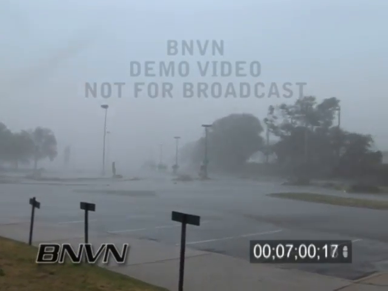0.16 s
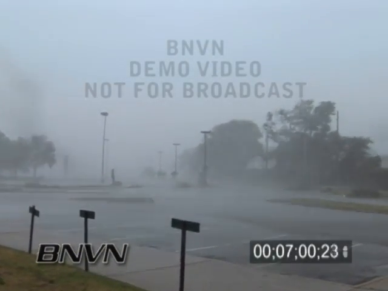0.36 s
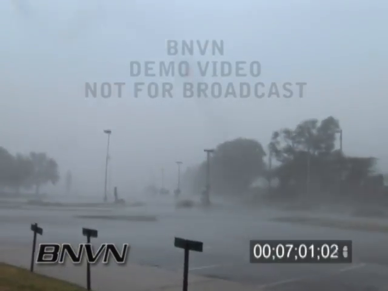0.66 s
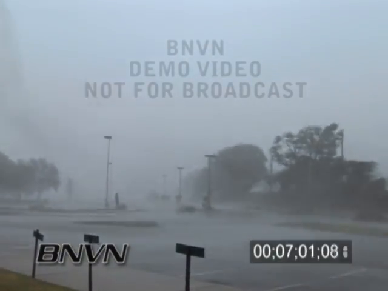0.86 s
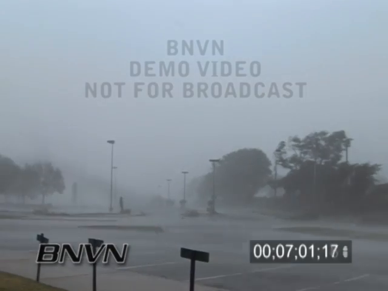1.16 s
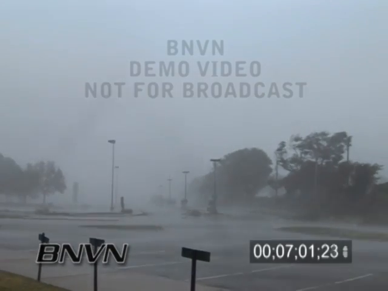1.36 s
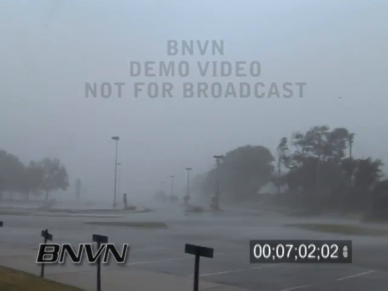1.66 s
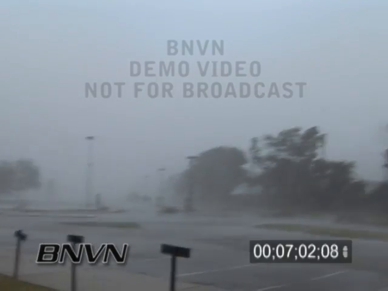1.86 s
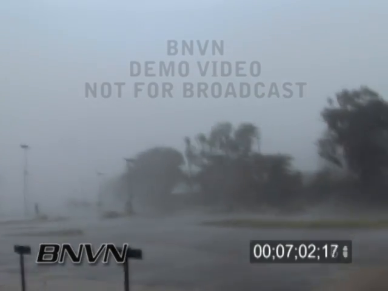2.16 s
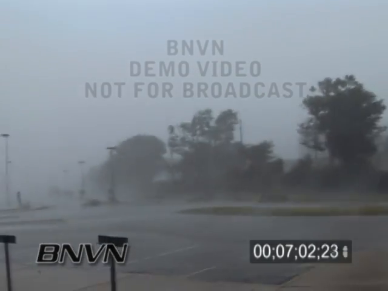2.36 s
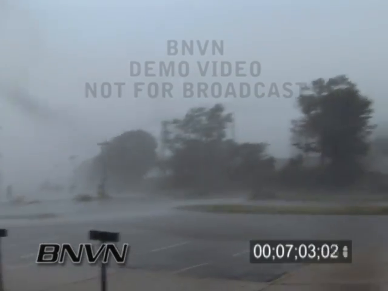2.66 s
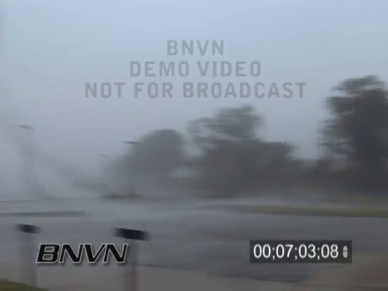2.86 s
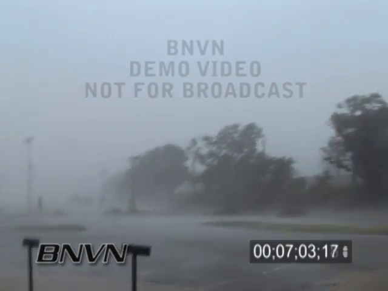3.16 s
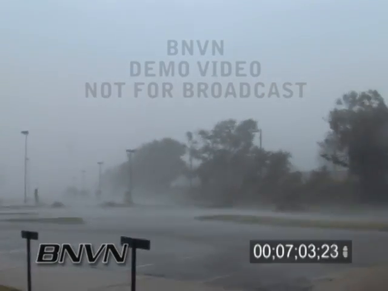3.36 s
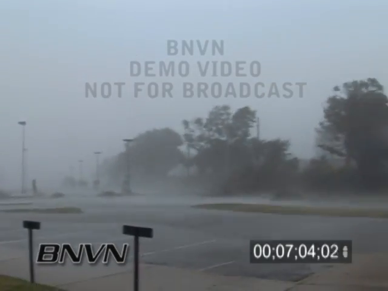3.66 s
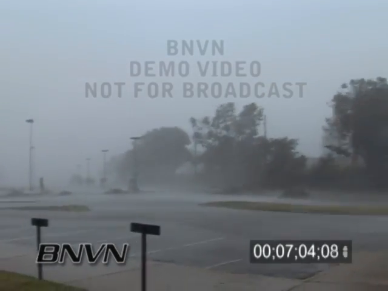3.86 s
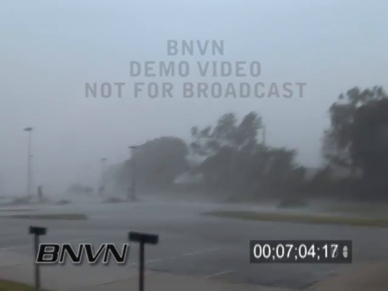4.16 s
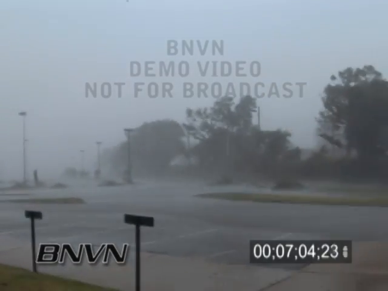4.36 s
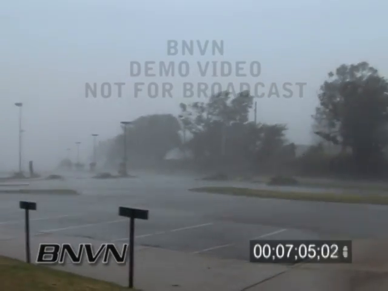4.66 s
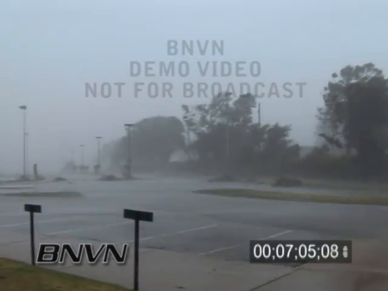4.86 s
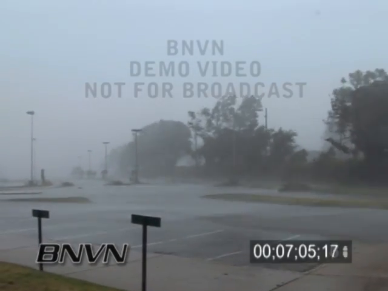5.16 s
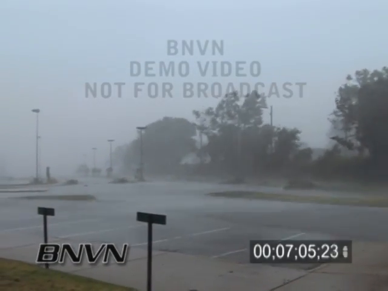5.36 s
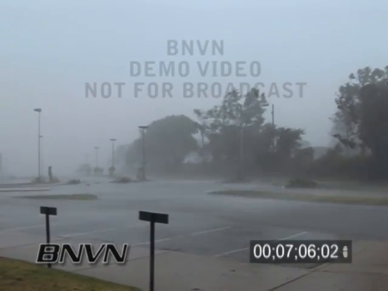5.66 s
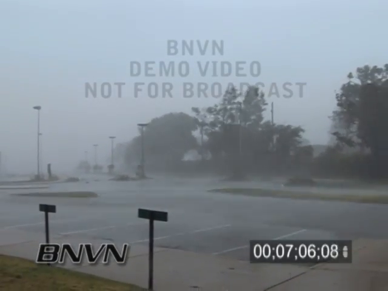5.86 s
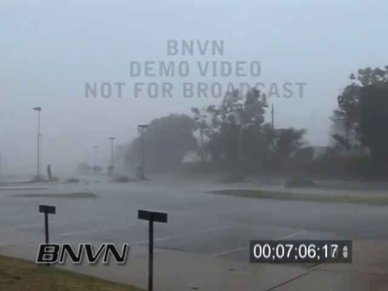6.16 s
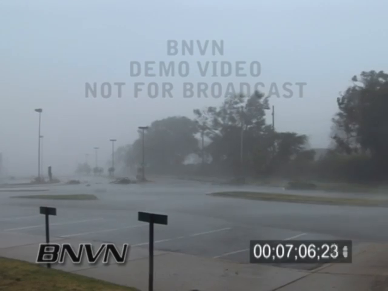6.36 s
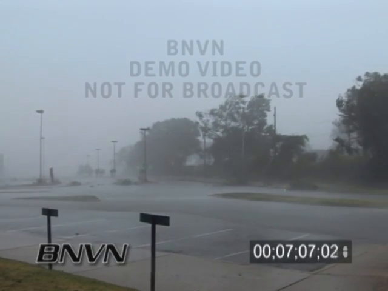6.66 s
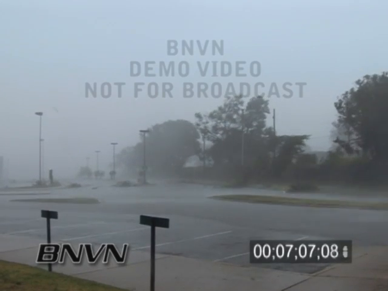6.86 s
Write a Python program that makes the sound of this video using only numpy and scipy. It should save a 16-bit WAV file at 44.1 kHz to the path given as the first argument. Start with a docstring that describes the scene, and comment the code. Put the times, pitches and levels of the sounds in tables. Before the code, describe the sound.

Steady rush of gale and heavy rain outdoors, bass gusts rumbling on the microphone, strongest in the first half, rain thinning slightly toward the end.

```python
"""An open car park, heard from under shelter while a storm sweeps across it.
Wind is filtered Gaussian noise in three layers: bass buffeting of the microphone, a low moan and a roar of far air.
Rain on the asphalt and fine spray are dense trains of random impulses, heard as a hiss with a sizzle on top.
Every layer but the smooth moan swells in patches of frequency; the rain and spray ease in the later part.
The stereo width varies with frequency: some treble bands are in phase, others in opposition."""
import sys
import numpy as np
from scipy import signal
from scipy.fft import rfft, irfft, next_fast_len
from scipy.io import wavfile

SR = 44100
rng = np.random.default_rng(int(sys.argv[2]) if len(sys.argv) > 2 else 0)


def put_to_file(sound):
    """Save the sound as 16-bit audio at rate SR, in the file named by the first command-line argument."""
    columns = np.atleast_2d(sound).T  # one column per channel
    safe = np.clip(columns, -1, 1)
    whole_steps = np.round(safe * 32767)
    wavfile.write(sys.argv[1], SR, whole_steps.astype(np.int16))


N = 309141  # length [samples]
SIZE = next_fast_len(N)  # transform length [samples]
HZ = np.maximum(np.arange(SIZE // 2 + 1) * SR / SIZE, 1)  # frequency of each spectral bin [Hz]

# Edges between neighbouring layers, from the bass up [Hz]
LOWEST_HZ, BUFFET_TOP_HZ, MOAN_TOP_HZ = 12, 200, 650
WIND_TOP_HZ, RAIN_TOP_HZ, SPRAY_TOP_HZ = 2500, 7400, 12500
CUTOFF_HZ = 12020  # edge of the final low-pass

# Spectral colour of wind, rain and spray: (frequency [Hz], relative density [dB per Hz])
WIND_COLOUR = [(12, -19), (22, -8), (30, -11), (40, -4), (65, -1), (90, -2), (120, 0), (160, -3), (190, -5),
               (230, -6), (290, -9), (370, -8.5), (500, -11), (650, -10.5), (800, -13), (1000, -11.5),
               (1250, -13.5), (1550, -10.5)]
RAIN_COLOUR = [(1900, -15), (2400, -18.5), (2950, -22), (3550, -19), (4200, -25.5), (5000, -26),
               (6000, -29), (6700, -35)]
SPRAY_COLOUR = [(7150, -38.5), (7400, -44), (7700, -39), (7950, -40.5), (8120, -46), (8350, -41.5),
                (8600, -41.5), (8950, -40), (9400, -40.5), (10100, -37), (10600, -38.5), (11100, -37),
                (11500, -39.5), (11900, -51)]

# Stereo width of wind, rain and spray; above 0 dB the channels move in opposition:
# (frequency [Hz], difference level minus sum level of the channels [dB])
WIND_STEREO = [(100, -75), (170, -62), (240, -41), (300, -21.5), (520, -15), (850, -11.5), (1400, -17.5),
               (2150, -6.5), (2550, -10.5), (2680, -55), (2850, -34), (2950, -75)]
RAIN_STEREO = [(4100, -75), (4230, -5.5), (4450, 11), (4550, 25), (4640, 32), (4780, 6), (5000, -11),
               (5140, -25), (5280, -22), (5420, -8), (5600, 6), (6000, 2.5), (6300, 21.5), (6500, 43),
               (6800, 40), (6900, 12)]
SPRAY_STEREO = [(7150, 7), (7400, 2), (7600, 5), (7850, 6), (8100, -3), (8400, -0.5), (8650, -4),
                (8950, -4), (9300, 7), (9800, -8), (10150, -13), (10450, -28), (10900, -27), (11100, -17),
                (11650, -14), (11800, -22), (11950, -40)]

# Part of the channel difference that follows the sum; a share in step above 0 is louder on the left:
# (frequency [Hz], share in step [ratio], share turned a quarter cycle [ratio])
SUM_TO_DIFFERENCE = [(300, 0.01, 0.089), (650, 0.028, -0.18), (1000, -0.2, -.05), (1600, 0, -.2),
                     (2000, -.2, -.06), (2400, -.05, .15), (4300, .1, .25), (4900, -.15, -.22),
                     (5700, -.2, .25), (6100, -.25, -.08), (7000, 0, .12), (7700, -.08, .18),
                     (8300, -.05, -.07), (9500, .15, .1), (11200, .03, -.07)]

# Gusts of wind, near and far: (time [s], buffeting level [dB], roar level [dB])
GUST_LEVELS = [(0, -29.5, -24), (0.3, -27.5, -25.5), (0.6, -26.5, -25), (0.85, -27.5, -24.0),
               (1.1, -25.5, -23.5), (1.3, -23, -23.0), (1.5, -25.5, -22.5), (1.7, -23, -22.0),
               (1.9, -23, -23), (2.05, -23.5, -24), (2.25, -24.5, -25.0), (2.45, -23.5, -24.5),
               (2.65, -22, -23.5), (2.88, -24, -24.5), (3.0, -21, -22), (3.15, -22.0, -22.5),
               (3.32, -23.5, -21.5), (3.47, -24.5, -24), (3.7, -22.5, -24), (3.9, -23.5, -24.5),
               (4.15, -22, -24.5), (4.4, -24.5, -25.5), (4.65, -25, -25.0), (4.95, -24.5, -25.5),
               (5.3, -25, -26), (5.65, -25.5, -25), (6.0, -24, -25.5), (6.3, -25, -26.0),
               (6.65, -24.5, -25), (7.0, -27, -25)]
# Low part of the far wind, swelling on its own: (time [s], level [dB])
MOAN_LEVEL = [(0, -29.5), (0.3, -29), (0.6, -30), (0.85, -28.5), (1.1, -27.5), (1.3, -25.5), (1.5, -25.5),
              (1.7, -25.5), (1.9, -26.5), (2.05, -27), (2.25, -27.5), (2.45, -28.0), (2.65, -27.5),
              (2.88, -28), (3.0, -27.5), (3.15, -24.5), (3.32, -26), (3.47, -28.0), (3.7, -27.5),
              (3.9, -28.5), (4.15, -29.0), (4.4, -28.5), (4.65, -28.5), (4.95, -28.5), (5.3, -29.0),
              (5.65, -28.5), (6.0, -29), (6.3, -28), (6.65, -28), (7.0, -30)]
# Spectral tilt of the wind, added at a layer's low edge and taken from its high edge:
# (time [s], buffeting lean [dB], roar lean [dB])
WIND_LEANS = [(0, 3.5, -1.5), (.5, 0.5, -1), (1.0, 1, -1.5), (1.4, 2, -0.5), (1.8, 3, -2.5),
              (2.4, 3.5, -1.5), (3.0, -0.5, -1), (3.6, 0, -1), (4.3, 1, -1), (5.0, 1.5, -1),
              (5.6, 0.5, -0.5), (6.3, 2.5, -1), (7.01, -0.5, -1)]
# Rain, driven harder in the gusts and easing later: (time [s], level [dB])
RAIN_LEVELS = [(0, -34.5), (0.3, -34.0), (0.6, -35.0), (0.85, -33), (1.1, -34.5), (1.3, -33), (1.5, -31.5),
               (1.7, -32.5), (1.9, -31.5), (2.05, -33.0), (2.25, -34), (2.45, -32.5), (2.65, -33),
               (2.88, -33.5), (3.0, -31.5), (3.15, -32), (3.32, -32.5), (3.47, -33.0), (3.7, -33.0),
               (3.9, -34), (4.15, -33.5), (4.4, -35.5), (4.65, -34.5), (4.95, -34.5), (5.3, -36),
               (5.65, -35.0), (6.0, -36.0), (6.3, -35.5), (6.65, -36), (7.0, -37)]
# Spray blown past in sheets: (time [s], level [dB])
SPRAY_LEVELS = [(0, -51), (0.3, -48.5), (0.6, -49.5), (0.85, -48.5), (1.1, -47.5), (1.3, -47.5), (1.5, -46),
                (1.7, -44.5), (1.9, -46), (2.05, -46.5), (2.25, -47), (2.45, -46), (2.65, -46.0),
                (2.88, -46), (3.0, -44), (3.15, -43.5), (3.32, -46.0), (3.47, -47), (3.7, -46.5),
                (3.9, -46), (4.15, -47.5), (4.4, -49.5), (4.65, -50.5), (4.95, -49), (5.3, -51.0),
                (5.65, -50), (6.0, -50.5), (6.3, -50.5), (6.65, -51.5), (7.0, -51.5)]


def buffeting(level_db, lean_db):
    """Turbulent pressure: eddies push on the microphone in lumps, a bass noise of unsteady colour."""
    eddies = noise_pair()
    lumps = patchy(eddies, LOWEST_HZ, BUFFET_TOP_HZ, count=4, patchy_db=0.5, rate_hz=7.1,
                   shared=0.52, lean_db=lean_db)
    return from_db(level_db) * lumps


def roar(level_db, lean_db):
    """Aerodynamic noise: far air tearing past trees and poles radiates a broad band."""
    far_air = noise_pair()
    rush = patchy(far_air, MOAN_TOP_HZ, WIND_TOP_HZ, count=5, patchy_db=0.55, rate_hz=12.0,
                  shared=0.22, lean_db=lean_db)
    return from_db(level_db) * rush


def moan(level_db):
    """Aerodynamic noise, low part: the far wind is a smooth band with almost no patchiness."""
    deep_air = noise_pair()
    smooth = patchy(deep_air, BUFFET_TOP_HZ, MOAN_TOP_HZ, count=3, patchy_db=0.02, rate_hz=5.9, shared=0.33)
    return from_db(level_db) * smooth


def rain(level_db):
    """Superposition of impacts: so many drops land at once that they blur to a hiss."""
    impacts = pair(drops(15000, spread_db=1.0))
    hiss = patchy(impacts, WIND_TOP_HZ, RAIN_TOP_HZ, count=6, patchy_db=0.97, rate_hz=14.6, shared=0.11)
    return from_db(level_db) * hiss


def spray(level_db):
    """Superposition of fine impacts: a sizzle above the rain whose bands flicker faster."""
    mist = pair(drops(15000, spread_db=-1.5))  # negative spread: the uneven drops are smaller
    sizzle = patchy(mist, RAIN_TOP_HZ, SPRAY_TOP_HZ, count=5, patchy_db=1.3, rate_hz=23.0, shared=0.1)
    return from_db(level_db) * sizzle


def drops(per_s, spread_db):
    """Shot noise: two trains of impulses at random moments, of random sign and uneven size."""
    unevenness = np.minimum(rng.exponential(1, (2, SIZE)), 5)
    sizes = from_db(spread_db * unevenness)
    signs = rng.choice([-1, 1], (2, SIZE))
    landed = rng.random((2, SIZE)) < per_s / SR
    return sizes * signs * landed


def noise_pair():
    """Random excitation: two independent Gaussian noises, coloured and spread over two channels."""
    return pair(rng.standard_normal((2, SIZE)))


def pair(excite):
    """Sum-and-difference stereo: left and right spectra, whose difference partly follows their sum."""
    first, second = rfft(excite)
    hz, in_step, turned = np.transpose(SUM_TO_DIFFERENCE)
    kin = np.interp(HZ, hz, in_step) + 1j * np.interp(HZ, hz, turned)
    independent = np.sqrt(np.clip(1 - abs(kin) ** 2, 0, 1))  # keeps the power of the difference
    width_db = along_hz(WIND_STEREO + RAIN_STEREO + SPRAY_STEREO)
    angle = np.arctan(from_db(width_db))
    middle = np.cos(angle) * first
    side = np.sin(angle) * (kin * first + independent * second)
    colour_db = along_hz(WIND_COLOUR + RAIN_COLOUR + SPRAY_COLOUR)
    return from_db(colour_db) * (middle + side * [[1], [-1]])


def patchy(spectra, low_hz, high_hz, count, patchy_db, rate_hz, shared, lean_db=0):
    """Band-wise modulation: overlapping bands swell partly together, partly alone; the whole has rms 1."""
    spectra = spectra * np.sqrt(above(low_hz) - above(high_hz))
    place = count * np.log(HZ / low_hz) / np.log(high_hz / low_hz)
    place = np.clip(place, 0, count)
    layer = 0
    together = drift(rate_hz / 2)
    for k in range(count + 1):
        window = np.clip(1 - abs(place - k), 0, 1)
        tilt_db = lean_db * (1 - 2 * k / count)
        swell_db = patchy_db * (shared * together + drift(rate_hz)) + tilt_db
        band = irfft(spectra * window, SIZE)[:, :N]
        layer = layer + from_db(swell_db) * band
    return rms_one(layer)


def drift(rate_hz):
    """Low-passed chance: noise at every 40th sample through two equal one-pole filters, rms 1."""
    pole = np.exp(-2 * np.pi * rate_hz * 40 / SR)
    white = rng.standard_normal(N // 40 + 2002)
    slow = signal.lfilter([1], [1, -2 * pole, pole * pole], white)
    slow = rms_one(slow[2000:])  # drop the filter's start
    return np.interp(np.arange(N) / 40, np.arange(len(slow)), slow)


def above(edge_hz):
    """Power crossover: a share that rises from 0 to 1 over a third of an octave around an edge."""
    return np.clip(.5 + 3 * np.log2(HZ / edge_hz), 0, 1)


def along_hz(points):
    """Logarithmic pitch axis: a (frequency, value) table read at every bin, straight between points."""
    hz, value = np.transpose(points)
    return np.interp(np.log(HZ), np.log(hz), value)


def in_time(rows):
    """Linear interpolation: the columns of a time table, one value per sample."""
    s, *columns = np.transpose(rows)
    return [np.interp(np.arange(N) / SR, s, c) for c in columns]


def from_db(db):
    """Logarithmic level: decibels to amplitude gain."""
    return 10 ** (np.asarray(db) / 20)


def rms_one(x):
    """Power normalisation: scale to unit rms."""
    return x / np.sqrt(np.mean(x ** 2) + 1e-20)


def scene():
    """Superposition of sources: wind in three layers, then rain and spray, each at its own level."""
    buffet_db, roar_db = in_time(GUST_LEVELS)
    buffet_lean_db, roar_lean_db = in_time(WIND_LEANS)
    moan_db, = in_time(MOAN_LEVEL)
    rain_db, = in_time(RAIN_LEVELS)
    spray_db, = in_time(SPRAY_LEVELS)
    wind = buffeting(buffet_db, buffet_lean_db) + roar(roar_db, roar_lean_db) + moan(moan_db)
    return wind + rain(rain_db) + spray(spray_db)


def record(dry):
    """Band limitation: a steep elliptic low-pass cuts the top."""
    # order 12, 0.5 dB ripple in the pass band, 70 dB down in the stop band
    low_pass = signal.ellip(12, .5, 70, CUTOFF_HZ, fs=SR, output="sos")
    return signal.sosfilt(low_pass, dry)


dry = scene()
out = record(dry)
put_to_file(out)
```